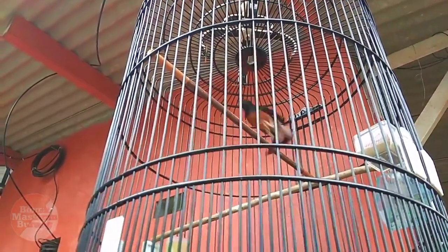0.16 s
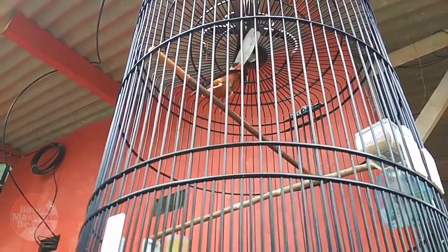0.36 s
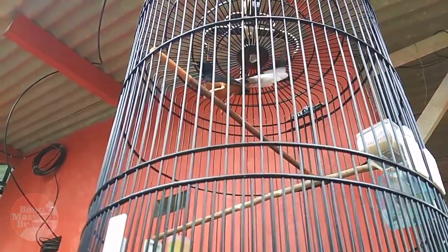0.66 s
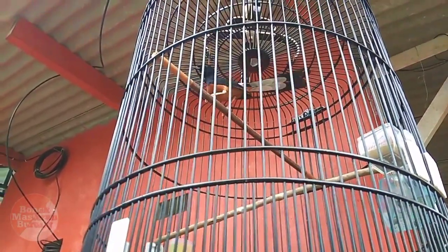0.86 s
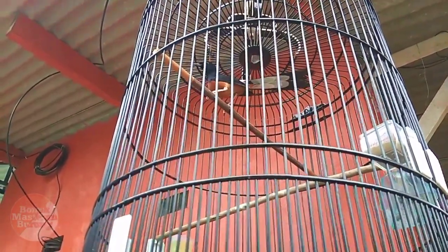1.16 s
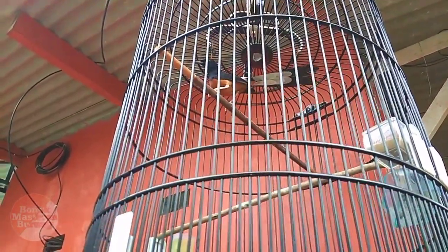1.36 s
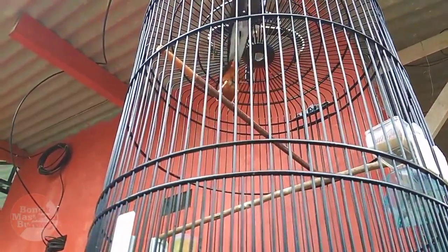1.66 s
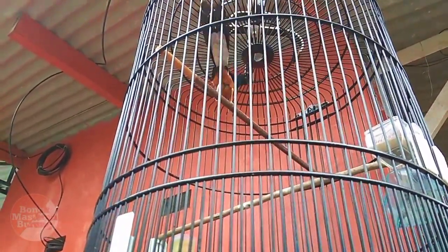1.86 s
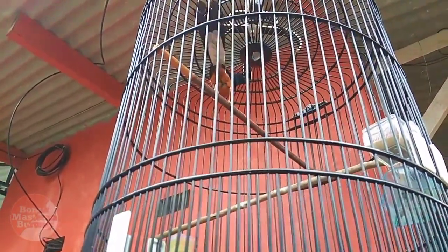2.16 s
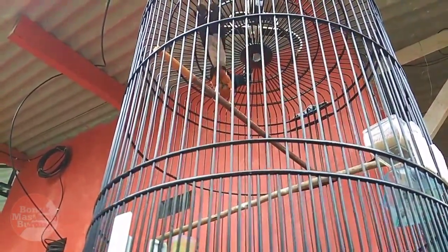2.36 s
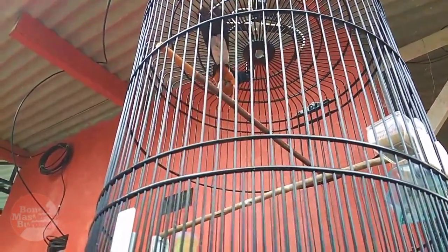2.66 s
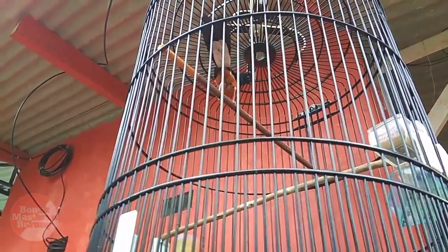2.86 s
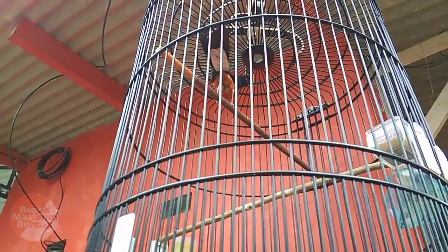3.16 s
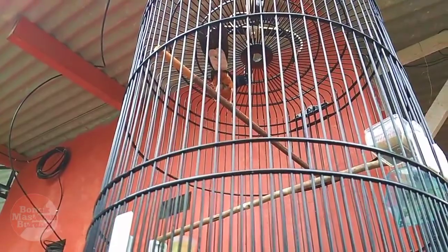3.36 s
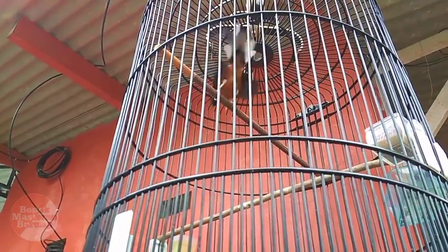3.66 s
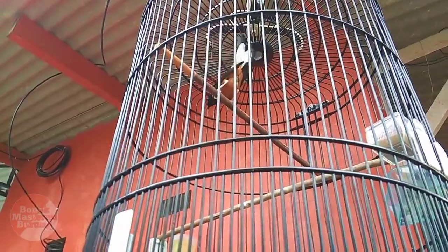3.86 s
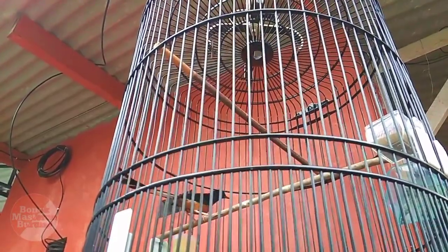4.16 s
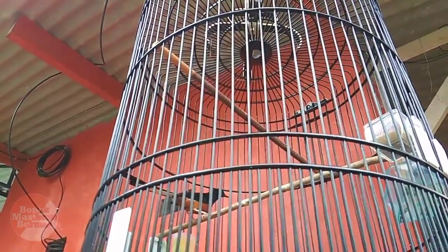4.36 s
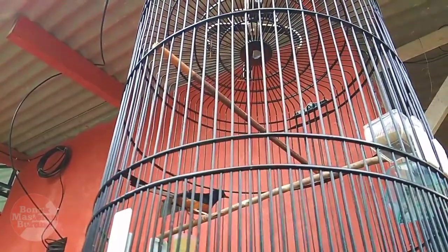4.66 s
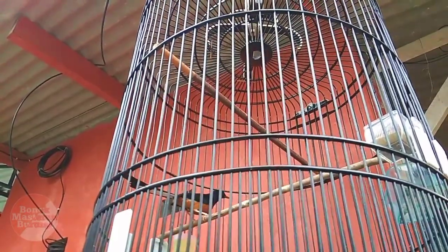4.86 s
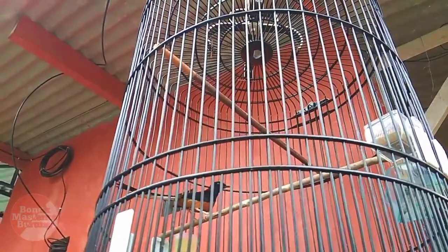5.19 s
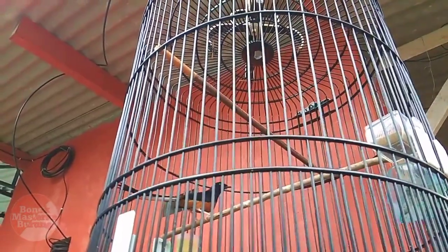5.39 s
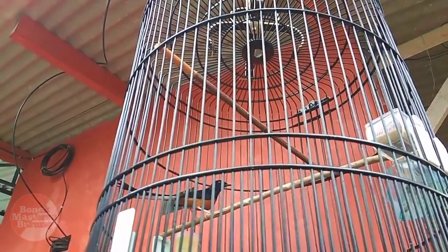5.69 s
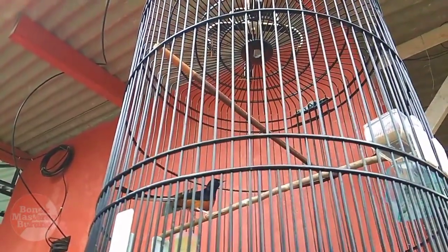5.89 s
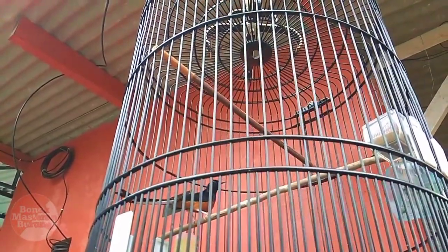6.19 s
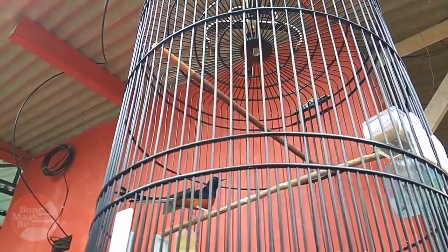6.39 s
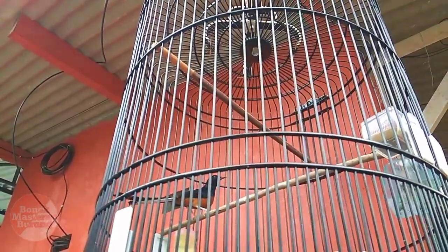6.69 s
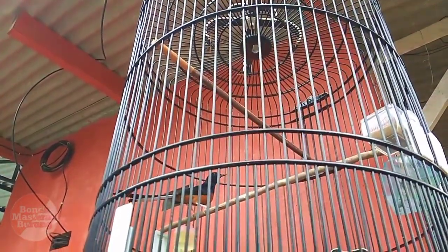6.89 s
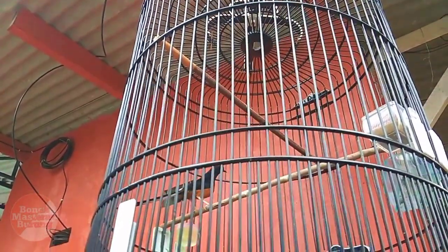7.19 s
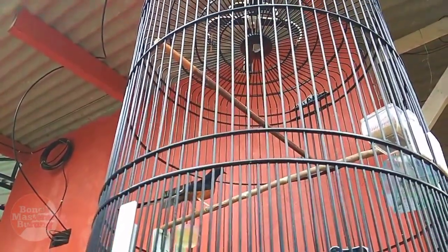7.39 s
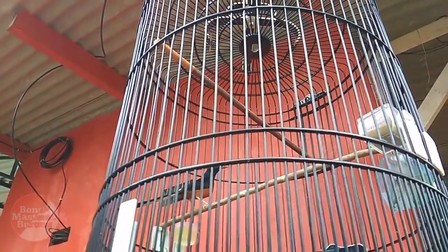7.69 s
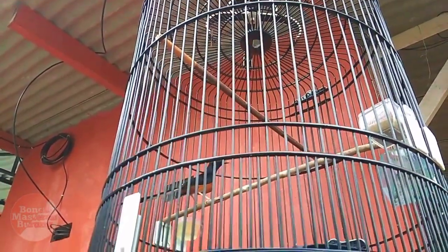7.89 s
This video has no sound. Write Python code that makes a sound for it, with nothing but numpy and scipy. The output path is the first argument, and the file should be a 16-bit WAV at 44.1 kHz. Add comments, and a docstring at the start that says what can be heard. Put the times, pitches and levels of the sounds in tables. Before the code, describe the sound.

A songbird in a cage under a porch roof opens with a hard double clack and thin rasps, then pours out rapid falling and rising whistles. A small motorbike putters close by at just over a second and drones away. Two more sharp clacks near four seconds bring grating notes, then sparser whistles and a repeated rising note. Stereo pickup near the cage, leaning left, with short bright echoes.

```python
"""Caged shama and a passing motorbike

Under a porch roof a shama sings slurred whistles (sliding near-sines), harsh rasps (tones shaken
fast in pitch and strength, with hiss) and sharp "tak" calls (short noise bursts); wall and roof echo.
Early on a single-cylinder motorbike putters past, built from firing harmonics, resonances and pulsed
noise, and drones away as its firing rate slowly climbs. A faint neighbourhood wash lies beneath."""
import sys
import numpy as np
from scipy import signal
from scipy.fft import rfft, irfft, next_fast_len
from scipy.io import wavfile

SR = 44100
rng = np.random.default_rng(int(sys.argv[2]) if len(sys.argv) > 2 else 0)


def transcribe(signal):
    """Save signal, clipped to [-1, 1], as a 16-bit WAV file at the path in sys.argv[1]."""
    frames = np.atleast_2d(signal).T
    limited = np.clip(frames, -1, 1)
    pcm = np.round(limited * 32767).astype(np.int16)
    wavfile.write(sys.argv[1], SR, pcm)


N = 354563
TIME = np.arange(N) / SR
EDGE_HZ = 15800  # upper band limit


def amp(db):
    """Decibels to gain."""
    return 10 ** (np.asarray(db) / 20)


def unit(x):
    """Scales to rms 1."""
    return x / np.sqrt(np.mean(x ** 2) + 1e-20)


def at_hz(points, hz):
    """Reads a spectrum on a log-frequency axis."""
    f, value = np.transpose(points)
    return np.interp(np.log(hz + 1), np.log(f + 1), value)


def follow(rows, t):
    """The columns of a curve at times t."""
    s, *columns = np.transpose(rows)
    return [np.interp(t, s, column) for column in columns]


def coloured(points):
    """Noise of rms 1 with the given spectrum."""
    size = next_fast_len(N)
    gain = amp(at_hz(points, np.fft.rfftfreq(size, 1 / SR)))
    return unit(irfft(rfft(rng.standard_normal(size)) * gain, size)[:N])


def wobble(hz):
    """Random motion of rms 1, mostly slower than hz."""
    low_pass = signal.butter(2, hz, fs=SR, output="sos")
    return unit(signal.sosfilt(low_pass, rng.standard_normal(N)))


def ring(x, hz, width_hz):
    """One resonance."""
    return signal.lfilter(*signal.iirpeak(hz, hz / width_hz, fs=SR), x)


def delayed(x, s):
    """The same sound s seconds later."""
    return np.concatenate([np.zeros(round(s * SR)), x])[:N]


def high_pass(hz, order):
    """A steep low cut."""
    return signal.butter(order, hz, "high", fs=SR, output="sos")


# colour of the neighbourhood wash: [f/Hz, level/dB]
AIR_COLOUR = [(15, -24.5), (25, -1.5), (148, -5), (227, -15), (631, -28.5), (782, -11), (1020, -26),
              (2230, -28), (6210, -33.5), (8810, -29.5), (12000, -34.5), (15500, -58.5)]


def air(level_db=-68.5, apart=1.0, swell_db=1):
    """The faint wash of the neighbourhood: noise partly shared by both sides, slowly swelling."""
    shared = coloured(AIR_COLOUR)
    sides = [unit(shared + apart * coloured(AIR_COLOUR)) for _ in range(2)]
    return amp(level_db + swell_db * wobble(4.16)) * np.array(sides)


# the motorbike's closest moment, its speed and its distance then
PASS_S, SPEED_M_PER_S, STREET_M = 1.326, 5.22, 5.27
AHEAD_M = SPEED_M_PER_S * (PASS_S - TIME)  # still to go before the closest point
DISTANCE_M = np.hypot(AHEAD_M, STREET_M)
# how hard the engine pulls: [t/s, level/dB]
ENGINE_LOAD = [(0, 1.5), (.24, 4.5), (.4, 0.5), (.72, 2.5), (1.05, 13), (1.5, 9.5), (1.66, 0), (2.05, -2.5),
               (2.3, -6), (2.7, 6.5), (3.3, 4.5), (3.9, 5.5), (4.7, 0), (5.3, 3.5), (6.25, -8.5),
               (6.55, 5.5), (7.3, 1.5), (8.04, 9)]
# parts of the bike, by name: [level at the pass before load/dB, loss per doubling of distance/dB,
# gain far ahead (the opposite far behind)/dB, share of the load (no unit)]
BIKE_PARTS = {"pipe": (-54.5, 12.5, 3, 0.97), "shell": (-50, 11, 8, 0.58), "drone": (-57.5, 9, -5, 0.25),
              "roar": (-52.5, 9.5, -0.3, 0.2), "spit": (-62, 10.5, 0, 0.9965)}


def passing(part):
    """Gain of one part of the motorbike's sound, from its distance, heading and load."""
    db, loss_db, approach_db, share = BIKE_PARTS[part]
    far_db = loss_db * np.log2(DISTANCE_M / STREET_M)
    heading_db = approach_db * AHEAD_M / DISTANCE_M
    return amp(db - far_db + heading_db + share * follow(ENGINE_LOAD, TIME)[0])


def exhaust_throb(firings, strength, harmonics_db, lag_firings=.18, fade_db=3.0):
    """The lowest six firing harmonics; away from the pass each level wavers by itself."""
    away = np.tanh(abs(TIME - PASS_S))
    out = np.zeros(N)
    for k, db in enumerate(harmonics_db, 1):
        tone = np.cos(2 * np.pi * k * (firings - lag_firings))
        out += amp(db + fade_db * away * wobble(5)) * tone
    return np.sqrt(2) * strength * out


def silencer_pipe(puff, pipe_hz=138):
    """Gusts of exhaust noise ring a broad double resonance in the pipe."""
    gusts = puff * rng.standard_normal(N)
    return passing("pipe") * unit(ring(ring(gusts, pipe_hz, 120), pipe_hz, 150))


# a house front behind the street: its distance from the bike and the level of its echo
WALL_M, WALL_DB = 3.0, -9


def off_wall(x):
    """Adds the house-front echo; its delay shrinks as the bike leaves, so harmonics swell and fade."""
    detour_m = np.hypot(AHEAD_M, STREET_M + 2 * WALL_M) - DISTANCE_M
    late_s = detour_m / 343  # speed of sound in m/s
    return unit(x + amp(WALL_DB) * np.interp(TIME - late_s, TIME, x))


def silencer_shell(firings, strength, puff, shell_hz=268):
    """Firing pulses and gusts ring the silencer's shell, heard with its wall echo."""
    pulses = unit(np.diff(np.floor(firings), prepend=np.floor(firings[0])) * strength)
    drive = pulses + 0.4 * unit(puff * rng.standard_normal(N))
    return passing("shell") * off_wall(ring(ring(drive, shell_hz, 110), shell_hz, 130))


# colour of the upper engine harmonics: [f/Hz, level/dB]
DRONE_COLOUR = [(190, -3), (300, -1.5), (450, -6.5), (620, -11), (770, -5), (900, -19.5)]


def drone(firings, rate, fade_hz=2.4):
    """Upper firing harmonics, each fading randomly as the reflections along the street change."""
    knots = np.linspace(0, N / SR, max(4, round(2 * fade_hz * N / SR)))
    out = np.zeros(N)
    for k in range(7, 27):
        a, b = rng.standard_normal((2, len(knots)))
        fade = np.interp(TIME, knots, a + 1j * b)
        out += amp(at_hz(DRONE_COLOUR, k * rate)) * (fade * np.exp(2j * np.pi * k * firings)).real
    return passing("drone") * unit(out)


# colour of the exhaust noise: [f/Hz, level/dB]
ROAR_COLOUR = [(150, -16.5), (350, 5), (550, -1), (800, -2), (1100, -12.5), (2200, -18.5), (4000, -22),
               (9000, -31.5)]


def exhaust_roar(puff):
    """Noise gusting with every firing, partly shared by both sides."""
    shared = coloured(ROAR_COLOUR)
    sides = [unit((shared + 1.5 * coloured(ROAR_COLOUR)) * (0.096 + puff)) for _ in range(2)]
    return passing("roar") * np.array(sides)


def valve_spit(firings, tick_firings=0.3, tick_uneven=0.88):
    """Crackling noise that jumps with every firing and dies away, unevenly strong."""
    crackle = [(700, 1.5), (2200, 8.0), (4500, -4.5), (8000, -1.5),
               (10500, -1), (13000, -17.5), (16000, -26.5)]  # [f/Hz, level/dB]
    tick = np.exp(-(firings % 1) / tick_firings + tick_uneven * np.tanh(wobble(20)))
    return passing("spit") * np.array([unit(coloured(crackle) * (0.77 + tick)) for _ in range(2)])


# treble of the bike: [t/s, tick level/dB, top sizzle level/dB]
TREBLE_LEVELS = [(0, -78, -93), (.7, -73, -83.5), (.82, -56, -83), (1.08, -62, -80), (1.11, -58, -56),
                 (1.2, -57, -58), (1.25, -67.5, -75), (1.32, -59, -70.5), (1.46, -112.5, -85),
                 (1.49, -65.5, -54.5), (1.53, -76, -54), (1.59, -78.5, -69.5), (1.8, -84, -76),
                 (3, -98, -95.5), (8.04, -100, -105)]
# colour of the ticks: [f/Hz, level/dB]
TICK_COLOUR = [(1500, -14), (4500, -11), (6500, 8.5), (9000, 8.5), (11000, -15), (13000, -8), (15500, -12)]
# colour of the sizzle: [f/Hz, level/dB]
SIZZLE_COLOUR = [(3000, -26), (6000, -4.5), (9000, 0.5), (11000, 2), (13000, 3), (15500, -14)]


def clatter(firings, tick_firings=.075, uneven_db=3, sizzle_firings=.3, sizzle_steady=0.49):
    """Every firing gives a sharp tick of uneven strength, and the top treble sizzles in pulses."""
    tick_db, sizzle_db = follow(TREBLE_LEVELS, TIME)
    number = np.floor(firings - np.floor(firings[0])).astype(int)
    since = firings % 1
    size = amp(uneven_db * np.tanh(rng.standard_normal(N)))[number]  # one draw per firing
    ticks = amp(tick_db) * unit(coloured(TICK_COLOUR) * size * np.exp(-since / tick_firings))
    pulse = sizzle_steady + np.exp(-since / sizzle_firings)
    sizzle = np.array([unit(coloured(SIZZLE_COLOUR) * pulse) for _ in range(2)])
    return ticks + amp(sizzle_db) * sizzle


# engine: [t/s, firing rate f/Hz, then level/dB of the exhaust's 2nd, 4th, 5th and 6th harmonic]
ENGINE_CURVE = [(0.0, 26.82, -54, -68.5, -65.5, -60.5), (0.22, 27, -59, -63, -54.5, -64.5),
                (0.4, 27.15, -62, -44, -43, -69), (0.54, 27.4, -55.5, -55.5, -45.5, -46.5),
                (0.83, 28.22, -64, -60, -51.5, -51.5), (0.94, 28.14, -58, -49, -39.5, -42.5),
                (1.2, 28.42, -49, -38, -32.5, -39.5), (1.43, 28.83, -41, -34, -29.5, -36.5),
                (1.53, 28.6, -41.5, -39, -29.5, -47), (1.59, 28.18, -46, -41, -37.5, -51.5),
                (2.01, 28.81, -53, -50, -42, -72), (2.19, 28.98, -54.5, -53.5, -52.5, -81.5),
                (2.66, 30.18, -53, -54, -47, -66), (3.52, 31.54, -55, -58.5, -68.5, -81),
                (3.8, 31.6, -61, -71, -63.5, -79), (4.28, 31.95, -61, -69.5, -64.5, -75),
                (5.17, 33.08, -67.5, -67.5, -68.5, -79.5), (5.37, 33.6, -73, -66, -78, -75.5),
                (6.05, 34.31, -72, -76.5, -82, -85), (6.63, 34.4, -71.5, -71, -73, -81),
                (7.35, 35.82, -67, -62.5, -73.5, -91), (8.04, 35.4, -74, -74, -76, -86)]


def motorbike(zero_s=1.312, uneven=0.26, puff_firings=1.0):
    """One firing count drives the throb, silencer, drone, gusts and ticking valves."""
    rate, second_db, fourth_db, fifth_db, sixth_db = follow(ENGINE_CURVE, TIME)
    firings = np.cumsum(rate) / SR
    firings -= np.interp(zero_s, TIME, firings)  # a firing falls on zero_s
    strength = np.exp(uneven * wobble(4.1))
    puff = np.exp(-(firings % 1) / puff_firings) * strength
    # 1st and 3rd harmonics lie below their upper neighbours
    harmonics_db = [second_db - 18.5, second_db, fourth_db - 15.5, fourth_db, fifth_db, sixth_db]
    low = exhaust_throb(firings, strength, harmonics_db) + silencer_pipe(puff)
    low += silencer_shell(firings, strength, puff) + drone(firings, rate)
    return low + exhaust_roar(puff) + valve_spit(firings) + clatter(firings)


# dry tak calls: [t/s, level/dB, decay/s, low edge f/Hz]
TAK_CALLS = [(0.1545, -18, 0.0029, 824), (0.1656, -27.5, 0.0011, 1200), (2.72, -60, 0.074, 6950),
             (2.936, -51, 0.039, 6960), (3.6679, -25, 0.0042, 1963), (3.9754, -22.5, 0.0021, 1760),
             (5.888, -51, 0.023, 8170), (7.085, -66, 0.022, 7006)]
# colour of the tak: [f/Hz, level/dB]
TAK_COLOUR = [(500, -14), (1600, -1), (2400, -12), (3700, -1), (4800, -7), (6400, -0.5), (8700, 1.5),
              (10500, -7.5), (13000, -7), (16000, -23)]


def taks(rise_s=0.002404):
    """Wide bursts with a sharp rise and a decay of milliseconds to tens of milliseconds."""
    out, t = np.zeros(N), np.arange(-SR // 100, SR // 8) / SR
    hz = np.fft.rfftfreq(len(t), 1 / SR)
    rise = np.clip(t / rise_s, 0, 1)
    for s, db, decay_s, edge_hz in TAK_CALLS:
        shape = rise * np.exp(-np.maximum(t - rise_s, 0) / decay_s)
        # keep only the phases of the noise, so the colour is filled evenly
        even = np.exp(1j * np.angle(rfft(shape * rng.standard_normal(len(t)))))
        low_cut = hz ** 2 / (hz ** 2 + edge_hz ** 2)
        burst = irfft(even * amp(at_hz(TAK_COLOUR, hz)) * low_cut, len(t))
        burst *= rise * (1 - t / t[-1]) ** 2
        at = round((s + t[0]) * SR) + np.arange(len(t))
        out[at] += amp(db) * burst * np.linalg.norm(shape) / np.linalg.norm(burst)
    return out


def syllable(s, length_s, ease_s):
    """Sample positions, progress from 0 to 1 and soft-edged gate of one syllable."""
    at = round(s * SR) + np.arange(round(length_s * SR))
    gate = signal.windows.tukey(len(at), min(1, 2 * ease_s * SR / len(at)))
    return at, np.linspace(0, 1, len(at)), gate


def swell(u, loudest, onset_db, end_db):
    """Level in dB along a syllable: one line to the point `loudest`, another to the end."""
    return np.interp(u, [0, np.clip(loudest, .01, .99), 1], [onset_db, 0, end_db])


# colour of the overtones and of the faint hiss in whistles: [f/Hz, level/dB]
THROAT_COLOUR = [(2000, -14), (4300, -13.5), (5400, -9), (7500, -10), (9000, -3), (11000, -7),
                 (12300, -8.5), (13200, -18), (15500, -22)]


def overtones(phase, hz, fall_db, count):
    """Syrinx harmonics from 2 to count - 1, falling by fall_db an octave, coloured by the throat."""
    out = 0
    for k in range(2, count):
        gain = amp(at_hz(THROAT_COLOUR, k * hz) - fall_db * np.log2(k / 2))
        out = out + gain * (k * hz < EDGE_HZ) * np.sin(k * phase)
    return out


# harsh syllables: [t/s, length/s, from f/Hz, to f/Hz, level/dB, loudest at (share of length),
# roughness (no unit), overtone and hiss level/dB]
RASP_SYLLABLES = [(0.188, 0.16, 4200, 4790, -61.5, 0.44, 0.1, 16.5),
                  (0.343, 0.13, 4940, 5500, -57.5, 0.61, 0.16, 6.5),
                  (0.362, 0.12, 1480, 1078, -49, 0.99, 0.54, -33),
                  (0.454, 0.14, 6580, 5150, -52.5, 0.46, 0.89, 8),
                  (0.599, 0.11, 6280, 4780, -46.5, 0.41, 0.51, 4),
                  (0.727, 0.16, 6220, 3860, -51, 0.15, 0.93, 1),
                  (2.128, 0.18, 4173, 5500, -59, 0.17, 0.14, 1),
                  (3.367, 0.18, 1696, 1074, -45, 0.19, 0.64, -19.5),
                  (4.064, .04, 3400, 3080, -58, 1, 0.31, 15),
                  (4.087, 0.21, 1695, 1072, -47, 0.55, 0.98, -11),
                  (4.109, 0.13, 6060, 6140, -50, 0.24, 0.05, 14.5),
                  (4.197, 0.049, 5275, 5780, -45, 0.55, 0.13, -14),
                  (4.411, 0.088, 2210, 2090, -36, 0.16, 0.47, -21),
                  (4.516, .18, 1988, 1620, -33, 0.074, 0.59, -24.5),
                  (5.787, 0.18, 2170, 2405, -61.5, 0.93, 0.67, -25),
                  (6.531, 0.2, 4480, 5920, -58.5, 0.11, 1.23, -14),
                  (7.598, 0.094, 3403, 3200, -69.5, 0.38, 0.8, -18)]
# breathy hiss of the high, harsh syllables: [f/Hz, level/dB]
HISS_COLOUR = [(2500, -26), (4400, -4.5), (5500, 2), (7500, 3), (9200, 0), (10300, -11), (11700, -13.5),
               (12800, -35.5), (15500, -25.5)]
# hiss of the low, grating syllables: [f/Hz, level/dB]
GRATE_COLOUR = [(2500, -21), (4000, -29), (5300, -6.5), (7200, -18.5), (8900, 9), (11500, -12), (12700, 6),
                (15500, -14)]
GRATE_BELOW_HZ = 2600  # syllables that start lower grate
TRILL_HZ = 135.9  # mean flutter rate of the syrinx


def rasps(swing=0.12, trill_swing=0.11, chop=0.6, trill_chop=0.4,
          hiss_db=-2, buzz_db=-1, grate_db=-1, floor_share=0.87):
    """The syrinx trills fast and unevenly in pitch and strength, and air hisses through the throat."""
    out, drift, shake = np.zeros(N), wobble(257), wobble(140)
    hiss, grate = coloured(HISS_COLOUR), coloured(GRATE_COLOUR)
    trill = 2 * np.pi * np.cumsum(TRILL_HZ * (1 + 0.28 * wobble(60))) / SR
    for s, length_s, from_hz, to_hz, db, loudest, rough, bright_db in RASP_SYLLABLES:
        grating = from_hz < GRATE_BELOW_HZ
        at, u, gate = syllable(s, length_s, ease_s=.0082 if grating else .018)
        hz = from_hz + (to_hz - from_hz) * u
        strength = gate * amp(db + swell(u, loudest, onset_db=-6.0, end_db=-12.5))
        bend = rough * (swing * drift[at] + trill_swing * np.sin(trill[at]))
        phase = 2 * np.pi * np.cumsum(hz * (1 + bend)) / SR
        if grating:
            top = amp(grate_db) * grate[at]
        else:
            # rougher syllables trade overtones for hiss
            buzz = overtones(phase, hz, fall_db=8.0, count=4) * np.exp(-rough / .12)
            top = amp(buzz_db) * buzz + amp(hiss_db) * np.sqrt(rough) * hiss[at]
        trill_beat = np.sin(trill[at] - 2 * np.pi / 3)
        beat = unit(np.exp(rough * (chop * shake[at] + trill_chop * trill_beat)))
        voice = beat * (np.sqrt(2) * np.sin(phase) + amp(bright_db) * top)
        low_cut = high_pass(floor_share * min(from_hz, to_hz), order=8)  # little lies below the note
        out[at] += strength * signal.sosfilt(low_cut, voice)
    return out


def slur(u, from_hz, to_hz, turn, spread):
    """Pitch slides from one note to another along an S, steepest at the turn."""
    slide = np.tanh((u - turn) / spread)
    return from_hz * (to_hz / from_hz) ** ((slide - slide[0]) / (slide[-1] - slide[0]))


# short slurs ring loudest where the throat resonates
SWEET_HZ, OFF_SWEET_DB_PER_OCT = 2312, -7.5


def sweetness(hz):
    """Level in dB lost as a slur leaves its own point nearest the throat's resonance."""
    octaves = abs(np.log2(hz / SWEET_HZ))
    return OFF_SWEET_DB_PER_OCT * (octaves - octaves.min())


EASE_S = 0.0072  # soft edge of a whistle


def short_slurs(rows, spread, **shape):
    """Sample positions, pitch and strength of short slurs, shaped by the throat's resonance."""
    for s, length_s, from_hz, to_hz, turn, db in rows:
        at, u, gate = syllable(s, length_s, EASE_S)
        hz = slur(u, from_hz, to_hz, turn, spread)
        yield at, hz, gate * amp(db + sweetness(hz) + swell(u, **shape))


# quick down-slurs: [t/s, length/s, from f/Hz, to f/Hz, steepest at (share of length), level/dB]
DOWN_SLURS = [(1.101, 0.048, 2763, 1760, 0.8, -34.5), (1.298, 0.051, 2640, 1790, 0.84, -33.5),
              (1.458, 0.036, 2340, 1890, 0.7, -26.5), (1.579, 0.039, 2311, 1880, 0.67, -29.5),
              (1.692, 0.028, 2402, 1750, 0.77, -28.5), (1.785, 0.043, 2320, 2135, 3, -27.5),
              (1.876, 0.029, 2350, 1880, 1.35, -29), (1.967, 0.042, 2462, 2300, 0.41, -31),
              (2.049, 0.059, 2770, 2290, 0.42, -36.5), (2.157, 0.044, 2448, 1910, 0.9, -34.5),
              (2.228, 0.044, 2413, 1668, 0.67, -37.5), (3.077, 0.042, 2360, 2200, 0.8, -39),
              (3.207, 0.056, 2806, 2262, 0.48, -45.5), (4.387, 0.035, 2950, 1894, 0.57, -34.5),
              (4.493, 0.04, 2528, 1566, 0.64, -33.5), (4.8, 0.036, 4650, 2793, 0.5, -43.5),
              (4.897, 0.045, 2396, 1930, 0.64, -42)]


def chips():
    """Quick falling notes, loudest midway."""
    return short_slurs(DOWN_SLURS, spread=.26, loudest=0.49, onset_db=-9.5, end_db=-4.5)


# up-slurs: [t/s, length/s, from f/Hz, to f/Hz, steepest at (share of length), level/dB]
UP_SLURS = [(1.56, 0.036, 1875, 2157, 0.54, -32), (1.666, 0.03, 2250, 2274, 0.59, -32.5),
            (2.279, 0.064, 1650, 2319, 0.22, -30), (2.412, 0.033, 1512, 2165, 0.55, -33.5),
            (2.453, 0.017, 2320, 2344, 0.54, -26.5), (2.521, 0.034, 1066, 1450, 0.74, -41.5),
            (2.596, 0.063, 1266, 2285, 0.41, -26), (2.707, 0.042, 1100, 1542, 0.49, -39),
            (2.745, 0.043, 1594, 1710, 0.55, -36), (2.797, 0.038, 1720, 1924, 0.52, -32.5),
            (2.904, 0.032, 2530, 3500, 0.66, -47.5), (2.924, 0.022, 1570, 2200, 0.32, -35)]


def rises():
    """Quick rising notes that push hardest at the end."""
    return short_slurs(UP_SLURS, spread=0.18, loudest=0.95, onset_db=-5.5, end_db=6.5)


# closing series of one rising whistle: [t/s, length/s, level/dB]
REFRAIN_NOTES = [(6.767, .12, -42), (6.991, 0.13, -41.5), (7.202, .12, -43), (7.419, .11, -45.5)]


def refrain(from_hz=1740, to_hz=2396, turn=0.62):
    """The same rising whistle again and again, growing through each note."""
    rows = [(s, length_s, from_hz, to_hz, turn, db) for s, length_s, db in REFRAIN_NOTES]
    return short_slurs(rows, spread=0.3345, loudest=0.5, onset_db=-16.5, end_db=5)


# long glides and thin side notes: [t/s, length/s, from f/Hz, to f/Hz,
# steepest at (share of length), level/dB, loudest at (share of length)]
GLIDE_NOTES = [(0.264, 0.013, 980, 980, .3, -47.5, 0.62), (3.267, 0.037, 903, 928, 0.12, -49, 0.53),
               (4, 0.021, 920, 1000, 0.61, -50.5, 0.51), (4.425, 0.028, 2178, 2057, 0.93, -32, 0.33),
               (4.826, 0.1, 2800, 2180, 0.33, -49, 0.35), (4.946, 0.188, 1272, 1150, 0.13, -60, 0.16),
               (4.95, 0.14, 4080, 5000, 0.24, -55.5, 0.2), (5.724, 0.15, 1175, 1394, 0.5, -69, 0.86),
               (5.87, 0.033, 2040, 2020, -0.082, -48.5, 0.094), (6.108, 0.17, 3754, 2562, 0.44, -46, 0.52),
               (6.332, 0.072, 4345, 3954, 0.075, -53.5, 1), (6.381, 0.12, 3870, 2915, 0.22, -43, 0.45),
               (6.557, 0.12, 3654, 2786, 0.099, -46, 0.24), (6.652, 0.048, 2785, 2740, 0.7, -36, 0.17)]


def glides():
    """Long glides and thin side notes, without the pull of the resonance."""
    for s, length_s, from_hz, to_hz, turn, db, loudest in GLIDE_NOTES:
        at, u, gate = syllable(s, length_s, EASE_S)
        hz = slur(u, from_hz, to_hz, turn, spread=.4)
        yield at, hz, gate * amp(db + swell(u, loudest, onset_db=-7.5, end_db=-11.5))


def whistles(waver=0.015, flutter=0.16, overtone_db=-52, brightening_db=46, hiss_db=-12):
    """Near-pure tones; high notes, beak wide open, let out a third harmonic, a second and some hiss."""
    out, drift, shake, hiss = np.zeros(N), wobble(120), wobble(150), coloured(THROAT_COLOUR)
    for at, hz, strength in [*chips(), *rises(), *refrain(), *glides()]:
        bend = waver * drift[at] * (hz / SWEET_HZ) ** .5
        phase = 2 * np.pi * np.cumsum(hz * (1 + bend)) / SR
        bright = amp(np.minimum(overtone_db + brightening_db * np.log2(hz / 2000), -14))
        third = amp(at_hz(THROAT_COLOUR, 3 * hz)) * np.sin(3 * phase)
        second = amp(at_hz(THROAT_COLOUR, 2 * hz) - 4) * np.sin(2 * phase)
        voice = np.sin(phase) + bright * (third + second + amp(hiss_db) * hiss[at])
        out[at] += np.sqrt(2) * strength * (1 + flutter * shake[at]) * voice
    return out


# near surfaces: [delay t/s, left level/dB, right level/dB]
NEAR_ECHOES = [(.0031, -10.5, -18), (0.0108, -8.5, -12.5), (0.019, -19, -11.5)]
# time the porch tail takes to fall by 60 dB: [f/Hz, decay t/s]
PORCH_DECAY = [(500, 0.23), (2300, 0.35), (5000, 0.41), (9000, 0.44), (15000, 0.32)]


def porch(x, scatter_db, tail_db, scatter_t60=0.12, shade_db=-1):
    """Direct sound a little to the left, wall and roof echoes, dense cage scatter and a longer tail."""
    t = np.arange(SR * 3 // 4) / SR
    hz, when, z = signal.stft(rng.standard_normal((2, len(t))), SR, nperseg=256)
    decay = amp(-60 * when / at_hz(PORCH_DECAY, hz)[:, None])
    tail = signal.istft(z * decay, SR, nperseg=256)[1][:, :len(t)] * np.minimum(t / 0.00091, 1)
    scatter = rng.standard_normal((2, len(t))) * amp(-60 * t / scatter_t60)
    scatter *= np.minimum(t / 0.00043, 1)
    room = amp(tail_db) * tail / np.linalg.norm(tail[0])
    room += amp(scatter_db) * scatter / np.linalg.norm(scatter[0])
    near = np.array([x, amp(shade_db) * x])
    for s, left_db, right_db in NEAR_ECHOES:
        near += amp([[left_db], [right_db]]) * delayed(x, s)
    return near + signal.fftconvolve(x[None], room, axes=1)[:, :N]


def scene():
    """The bird in its porch, with the street behind."""
    song = porch(whistles() + rasps(), scatter_db=-7, tail_db=1.0)
    calls = porch(taks(), scatter_db=-0.5, tail_db=-12.5)
    return air() + motorbike() + song + calls  # the street is heard without the porch


# balance of the microphones: [f/Hz, left minus right level/dB]
MIC_BALANCE = [(100, 6.5), (600, 6.5), (1400, 7), (2500, 9.5), (5000, 6.5), (9000, 10.5), (13000, -1)]


def record(dry):
    """The left microphone is nearer and, below the top treble, more sensitive; then the band limit."""
    size = next_fast_len(N)
    ratio = amp(at_hz(MIC_BALANCE, np.fft.rfftfreq(size, 1 / SR)))
    gains = np.array([2 * ratio, np.full_like(ratio, 2)]) / (1 + ratio)
    left, right = irfft(rfft(dry, size) * gains, size)[:, :N]
    right = delayed(right, 16 / SR)
    edge = signal.firwin(511, EDGE_HZ, window=("kaiser", 9), fs=SR)
    return signal.oaconvolve(np.array([left, right]), edge[None], "same")


dry = scene()
out = record(dry)
transcribe(out)
```